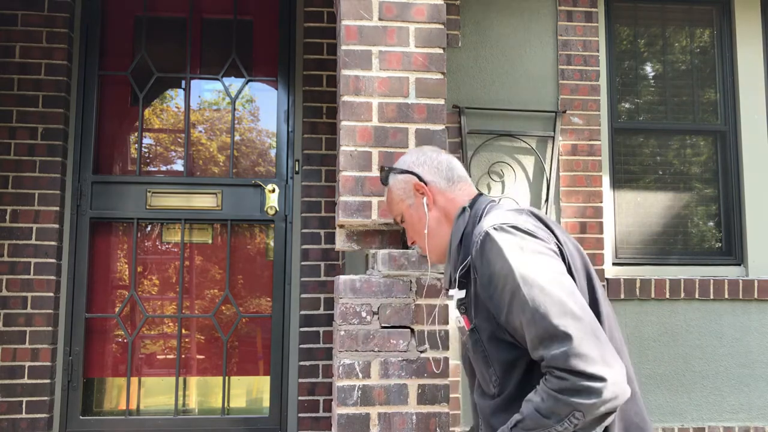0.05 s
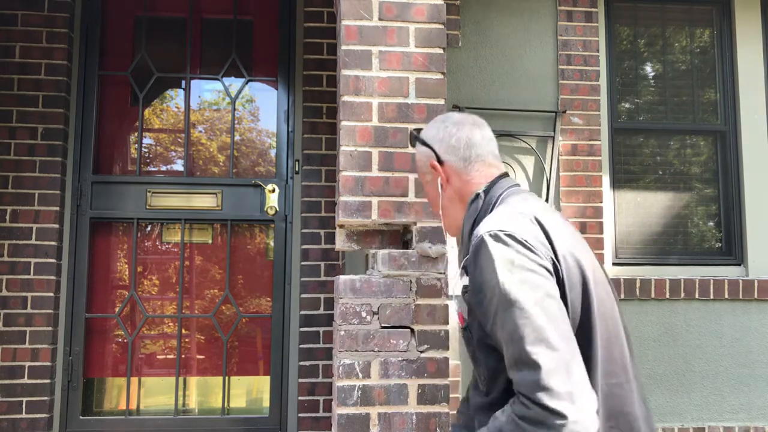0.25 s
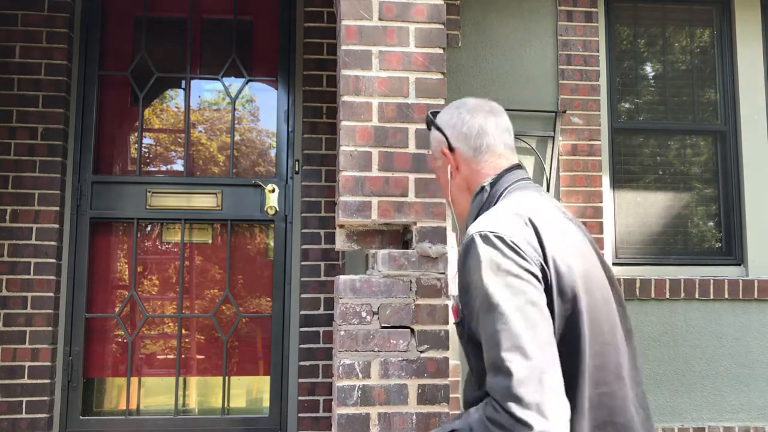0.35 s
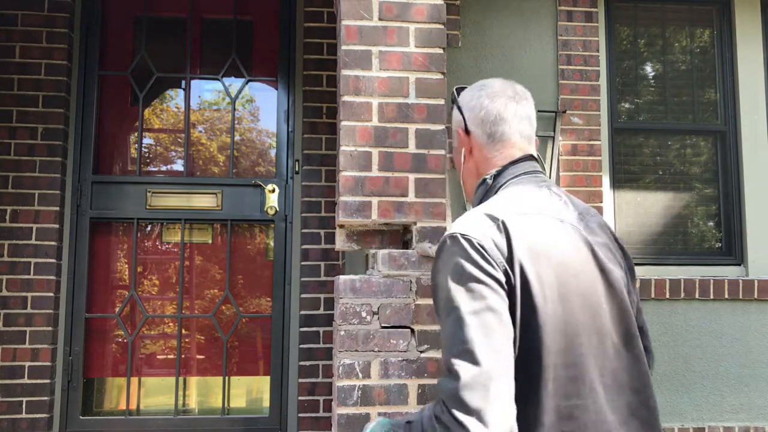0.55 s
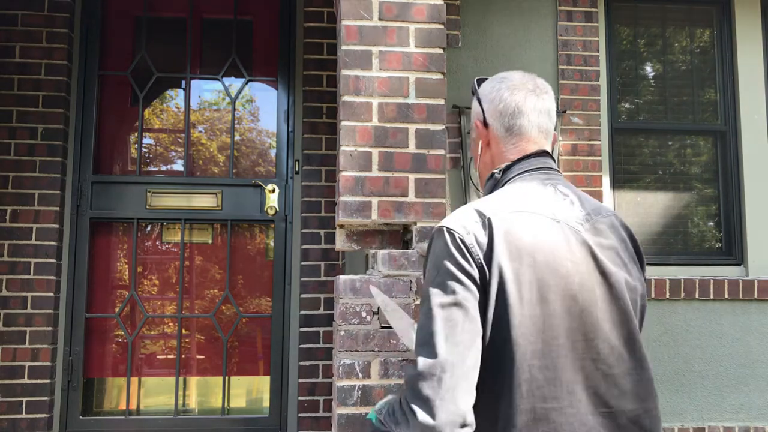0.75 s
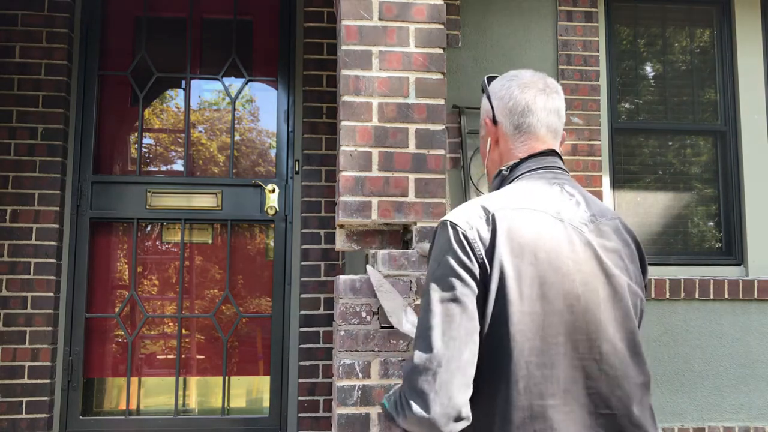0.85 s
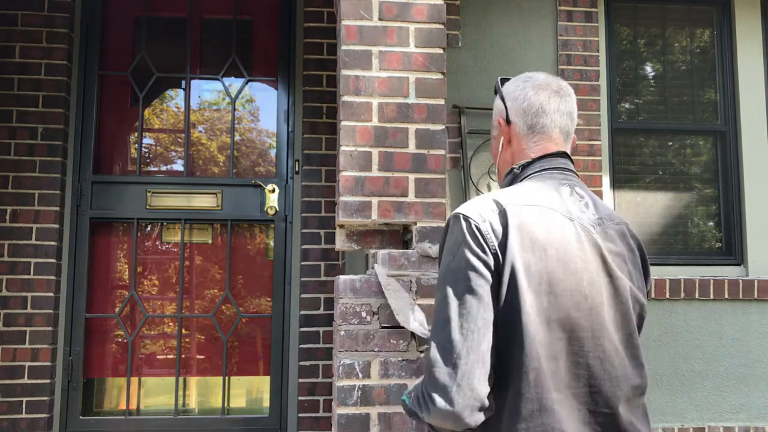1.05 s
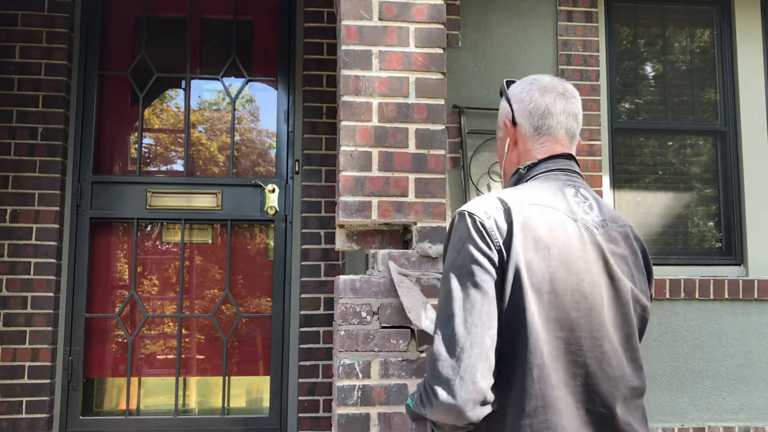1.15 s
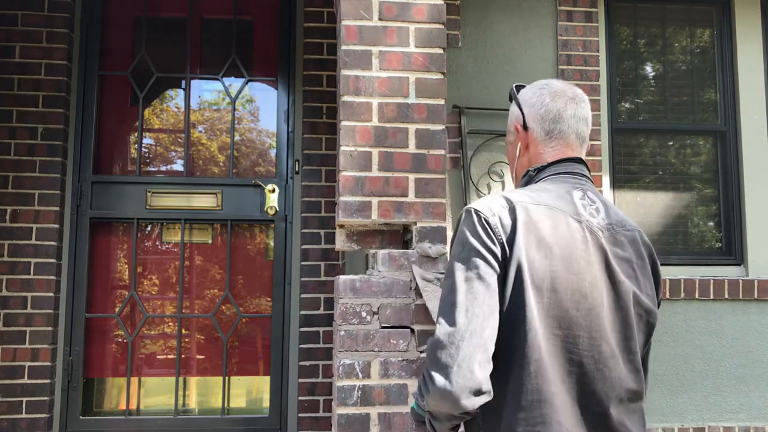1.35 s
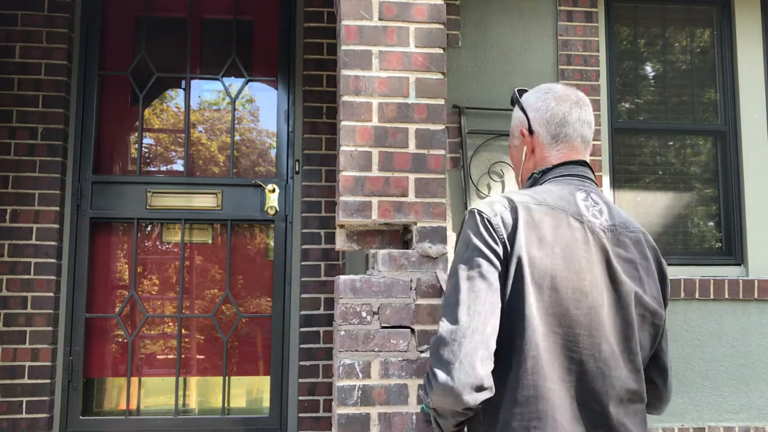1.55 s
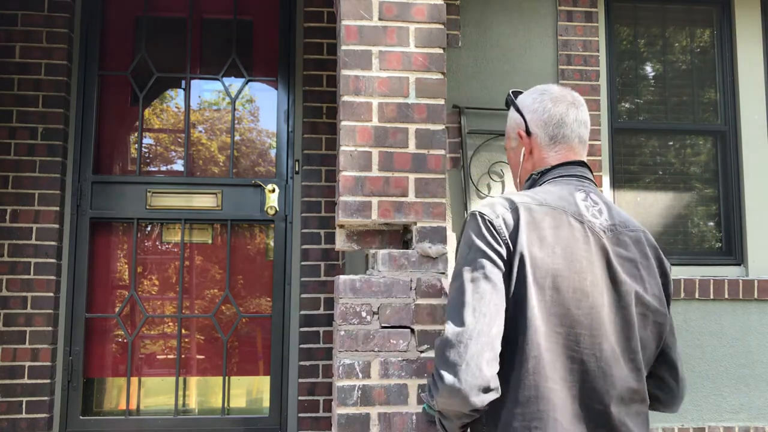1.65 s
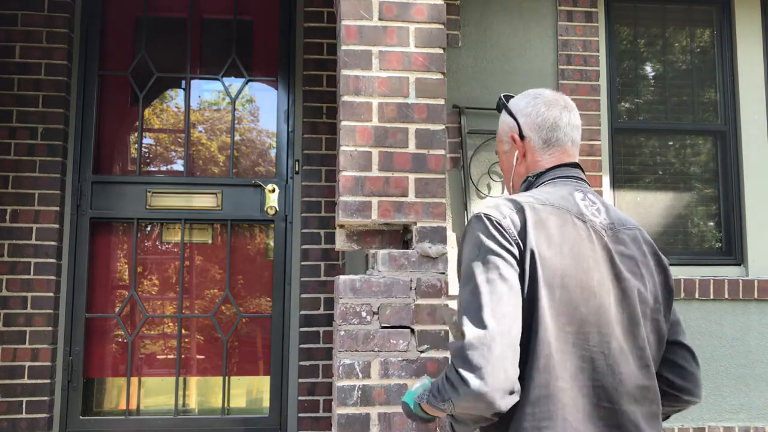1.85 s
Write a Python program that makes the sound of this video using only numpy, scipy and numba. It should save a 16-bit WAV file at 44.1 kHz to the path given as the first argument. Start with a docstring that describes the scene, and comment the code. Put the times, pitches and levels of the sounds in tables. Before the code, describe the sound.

Outdoors, a trowel gives one sharp knock on brick and then drags across the masonry, crunching sand as the blade rings. Clothing rustles and thumps softly against the microphone throughout.

```python
"""Over quiet outdoor air, a worker's jacket stirs close to the microphone. At 0.2 s a steel trowel
knocks once on a brick: the impact excites the modes of both, and the porch reflects it briefly.
The jacket bumps and rustles on. From 0.9 to 1.6 s the trowel is dragged over gritty masonry, where
stick-slip friction on grains drives the resonances of the blade, sand crunches and the tip rasps.
Two faint ticks and a few last bumps of the jacket follow."""
import sys
import numpy as np
from scipy import signal
from scipy.fft import rfft, irfft
from scipy.io import wavfile
from scipy.ndimage import uniform_filter1d
from numba import njit

SR = 44100
rng = np.random.default_rng(int(sys.argv[2]) if len(sys.argv) > 2 else 0)


def pcm_store(signal):
    """Save signal as 16-bit PCM."""
    levels = np.round(np.clip(np.atleast_2d(signal), -1, 1) * 32767)
    wavfile.write(sys.argv[1], SR, levels.astype(np.int16).T)


N = 83790


def undb(db):
    return 10 ** (np.asarray(db) / 20)


def unit(x):
    """Scale to rms 1."""
    return x / np.sqrt(np.mean(x ** 2))


def noise():
    return rng.standard_normal(N)


def clock():
    return np.arange(N) / SR


def ages(length):
    """Sample times over `length` s, at most 1 s."""
    return np.arange(int(min(length, 1) * SR) + 1) / SR


def place(events):
    """Superpose (time [s], sound) pairs."""
    out = np.zeros(N + 2 * SR)
    for s, sound in events:
        at = SR + int(round(s * SR))
        out[at:at + len(sound)] += sound
    return out[SR:SR + N]


def curve(rows, column=1):
    """Gain interpolated in time along a column of levels."""
    rows = np.array(rows)
    return undb(np.interp(clock(), rows[:, 0], rows[:, column]))


def decay(tau):
    """Sudden onset, exponential decay."""
    age = ages(10 * tau)
    return np.minimum(age * SR / 20, 1) * np.exp(-age / tau)


def fade(start, tau):
    return place([(start, decay(tau))])


def tail(start, t60):
    """A decay of 60 dB in `t60` s."""
    return fade(start, t60 / np.log(1000))


def swells(rows):
    """A rounded rise and fall per row."""
    return place((s, undb(db) * np.sqrt(np.abs(np.sin(np.pi * ages(length) / length))))
                 for s, length, db in rows)


def snags(rows):
    """A sudden onset and linear fall per row."""
    return place((s, undb(db) * (1 - ages(length) / length)) for s, length, db in rows)


def grains(per_s, spread_db):
    """Poisson impulses, many small and a few large; rms 1."""
    impulses = (rng.random(N) < per_s / SR) * rng.choice([-1, 1], N)
    return unit(impulses * undb(spread_db * np.minimum(rng.exponential(size=N), 5)))


def colour(x, spectrum, size=4096):
    """Minimum-phase filter of unit power gain, shaped like `spectrum`."""
    hz, db = np.array(spectrum).T
    f = np.maximum(np.fft.rfftfreq(size, 1 / SR), 2)
    rolloff = np.sqrt((1 + (hz[0] / f / 2) ** 4) * (1 + (f / hz[-1] / 2) ** 4))
    gain = unit(undb(np.interp(np.log(f), np.log(hz), db)) / rolloff)
    cepstrum = irfft(np.log(gain))[:size // 2]
    cepstrum[1:] *= 2
    return signal.oaconvolve(x, irfft(np.exp(rfft(cepstrum, size))))[:N]


@njit
def moving_resonance(x, hz, width_hz):
    """State-variable band-pass with a moving centre of gain 1."""
    y, band, low = np.empty(len(x)), 0., 0.
    for i in range(len(x)):
        g, k = np.tan(np.pi * hz[i] / SR), width_hz / hz[i]
        v = (band + g * (x[i] + 1e-18 - low)) / (1 + g * (g + k))
        band, low, y[i] = 2 * v - band, low + 2 * g * v, k * v
    return y


# outdoor spectrum (frequency [Hz], level [dB])
AIR_SPECTRUM = [(120, -27.5), (200, -10.5), (283, -25), (777, -21), (986, -25), (1120, -25), (2330, -32),
                (7270, -34.5), (16000, -48.5)]
def air(db=-62):
    """Stationary noise forms the outdoor background."""
    return undb(db) * colour(noise(), AIR_SPECTRUM)


# sliding cloth and short scuffs (time [s], duration [s], level [dB])
SWISHES = [(-.03, 0.077, -58), (.515, 0.048, -59), (.73, 0.058, -65.5), (.79, 0.12, -64), (1.75, .08, -65)]
RUBS = [(.4885, 0.013, -47.5), (.5615, 0.0066, -45.5), (.669, 0.019, -42.5), (.685, 0.058, -42.5),
        (.746, 0.024, -38), (.765, 0.03, -52.5), (.803, 0.015, -41), (.818, 0.037, -52)]
# rumble envelope (time [s], level [dB])
SWAY = [(0, -58), (.15, -57.5), (.22, -33.5), (.33, -50.5), (.385, -36), (.42, -45), (.55, -39), (.61, -43),
        (.68, -37.5), (.77, -33.5), (.86, -42), (.95, -37), (1.22, -39), (1.3, -52.5), (1.5, -48.5),
        (1.57, -62), (1.67, -50.5), (1.77, -56), (1.9, -39)]
# cloth spectra (frequency [Hz], level [dB])
SWISH_SPECTRUM = [(1500, 0), (4000, 6), (7000, 5), (10000, 0), (16000, -10)]
RUB_SPECTRUM = [(300, 2.5), (500, 10), (900, -23.5), (1300, -3), (1580, 6), (1900, -3.5), (3000, -12),
                (6000, -23.5), (14000, -72)]
RUMBLE_SPECTRUM = [(25, -30.5), (50, -2), (85, 3), (160, -4), (250, -14.5), (500, -24), (1000, -35.5)]
def jacket_rustle():
    """Friction of cloth radiates noise: sliding swishes and fibres snag, over the rumble of its sway."""
    swish = colour(noise() * swells(SWISHES), SWISH_SPECTRUM)
    rumble = colour(noise() * curve(SWAY), RUMBLE_SPECTRUM)
    rub = colour(grains(per_s=6000, spread_db=2) * snags(RUBS), RUB_SPECTRUM)
    return swish + rumble + rub


def ring(modes, start, rise_s=.00031):
    """Free vibration is a sum of damped modes; neighbours swing in antiphase."""
    def mode(hz, db, t60):
        age = ages(2 * t60)
        envelope = np.minimum(age / rise_s, 1) * np.exp(-np.log(1000) * age / t60)
        return undb(db) * envelope * np.cos(2 * np.pi * hz * age)
    return place((start, -(-1) ** k * mode(*row)) for k, row in enumerate(modes))


# modes of the struck steel and brickwork (frequency [Hz], level [dB], T60 [s])
STEEL_MODES = [(1150, -16, .025), (1400, -9, .03), (1735, -28, .12), (1900, -11, .028), (2130, -11, .036),
               (2570, -15, .028), (2975, -16, .04), (3280, -18, .028)]
BRICK_MODES = [(189, -16, 0.092), (248, -14.5, 0.14), (337, -8, 0.036), (466, -9, 0.032), (508, -33, .2),
               (685, -33.5, 0.21), (747, -30.5, 0.25), (786, -20, 0.21), (839, -33, 0.22),
               (1277, -33, 0.19)]
# spectra of the contact and the porch's reverberation (frequency [Hz], level [dB])
CRACK_SPECTRUM = [(1500, 7), (3000, -3), (6000, -4), (8000, -11), (9200, -4.5), (12000, -13), (16000, -21)]
PORCH_SPECTRUM = [(130, -19.5), (190, 4), (330, -2.5), (780, 1), (1000, -9.5), (1300, -11), (3000, -16.5),
                  (4500, -22), (10000, -31), (16000, -42)]
def knock(touch_s=.2022, land_s=.2048, crack_s=.0037, thud_hz=717):
    """Impact excitation: the edge touches, the full weight lands, both bodies ring, the porch answers."""
    contacts = fade(touch_s, crack_s) + undb(-4) * fade(land_s, crack_s)
    crack = undb(-13) * colour(noise() * contacts, CRACK_SPECTRUM)
    thud = -undb(-15) * fade(land_s, tau=.0033) * np.sin(2 * np.pi * thud_hz * (clock() - land_s))
    reflections = undb(-15.5) * tail(land_s, t60=.15) + undb(-34) * tail(land_s, t60=.46)
    porch = colour(noise() * reflections, PORCH_SPECTRUM)
    return crack + thud + ring(STEEL_MODES, touch_s) + ring(BRICK_MODES, land_s) + porch


# pressure pulses (time [s], peak level [dB], frequency [Hz])
BUMPS = [(0.406, -28, 105), (0.436, -26.5, 87), (0.471, -27, 80), (0.5079, -18.5, 132), (0.545, -27.5, 114),
         (0.568, -22, 79.3), (0.644, -27.5, 85), (0.6513, -27, 131), (0.675, -23, 106),
         (0.7258, -27.5, 164), (.754, -26, 163), (0.8234, -26.5, 93), (0.897, -29, 107),
         (1.018, -18.5, 117.4), (1.028, -23.5, 85), (1.069, -24, 108), (1.089, -27, 113), (1.197, -21, 125),
         (1.2213, -30.5, 123), (1.521, -36, 92), (1.707, -31, 100), (1.809, -33, 137), (1.867, -34.5, 87.3)]
def jacket_bumps(window_s=.1):
    """Soft contact with the microphone makes a low pulse: a pressure dip between two rises."""
    def pulse(db, hz):
        u = (np.pi * hz * (ages(window_s) - window_s / 2)) ** 2
        return undb(db) * (2 * u - 1) * np.exp(-u)
    return place((s - window_s / 2, pulse(db, hz)) for s, db, hz in BUMPS)


# load on the blade (time [s], press [0-1])
PRESS = [(1.08, 0.15), (1.13, 0.59), (1.19, 0.2), (1.25, 0.04), (1.285, 0.58), (1.385, 0.72), (1.42, 0.78),
         (1.48, 0.32)]
def pressure():
    """Normal load: how hard the blade is pressed flat."""
    return np.interp(clock(), *np.array(PRESS).T)


def chatter(per_s=230, depth_db=2.4, ease=.4):
    """Stick-slip friction comes in uneven bursts, which even out under load."""
    step = int(SR / per_s)
    drift = 1.35 * uniform_filter1d(noise()[np.arange(N) // step], step)  # spread near 1
    return unit(undb(depth_db * (1 - ease * pressure()) * np.minimum(drift, 2)))


def driven_mode(push, hz, width, db, drifts_per_s=22, drift_db=1.5, detune=.011):
    """A resonance whose strength and pitch drift as the contact point moves."""
    steps = np.arange(len(push)) * drifts_per_s / SR
    louder, higher = (np.interp(steps, np.arange(64), row) for row in rng.standard_normal((2, 64)))
    response = moving_resonance(push, hz * (1 + detune * higher), float(width))
    return undb(db + drift_db * louder) * response * np.sqrt(SR / (np.pi * width))


def pressed_ring(push, modes, neighbour_sign, start_s=.88, end_s=1.68):
    """Modal superposition: pressing the steel flat favours some modes over others."""
    span = slice(int(start_s * SR), int(end_s * SR))
    press = pressure()[span]
    sound = 0
    for k, (hz, width, db, pressed_db) in enumerate(modes):
        load_gain = 1 + (undb(pressed_db) - 1) * press
        sound += neighbour_sign ** k * load_gain * driven_mode(push[span], hz, width, db)
    return place([(start_s, sound / np.sqrt(len(modes)))])


# bending modes of the blade and high modes of its edge
# (frequency [Hz], bandwidth [Hz], level [dB], gain at full press [dB])
BLADE_MODES = [(709, 33, -3, -4), (832.5, 31, 4, 0.5), (954.7, 17.5, -3, 1), (993.3, 40, -4.5, 7),
               (1270.6, 30, -7.5, 12.5), (1360, 47, 1, 9.5), (1454, 210, 1, 2.5), (1664, 124, -6.5, 18.5),
               (1796, 113, 0, 7.5), (1901, 60, 2, -4.5), (2085, 58, -4.5, 3), (2244, 21, -10, 2.5),
               (2610, 100, -8, -20)]
EDGE_MODES = [(3248, 70, -5.5, 3.5), (3635, 230, 1, -2.5), (4200, 120, -4, -10), (4466, 150, -5, 6),
              (5030, 150, -8, -2), (5400, 60, -9, 4), (5866, 114, 1, -2), (6240, 110, -7.5, 9),
              (6720, 150, -7.5, 2.5), (7600, 36, -10, -10), (8430, 200, -8, 6), (9350, 310, -0.5, -7),
              (10110, 190, -0.5, -9), (11050, 73, -8, -8), (12300, 250, -14, 2), (14200, 270, -21, 0)]
def trowel_ring(blade_push, edge_push):
    """Forced vibration: blade modes alternate in sign; edge modes agree, leaving antiresonances."""
    return pressed_ring(blade_push, BLADE_MODES, -1) + pressed_ring(edge_push, EDGE_MODES, 1)


# drive from the stroke and from catches on larger grains (time [s], blade level [dB], edge level [dB])
STROKE = [(.9, -86.5, -95), (.915, -34, -68), (.945, -51, -71), (.963, -32.5, -44), (1.015, -50, -46.5),
          (1.035, -38.5, -39.5), (1.06, -38, -38.5), (1.108, -37, -43.5), (1.14, -34, -30),
          (1.205, -36, -45.5), (1.26, -33, -39.5), (1.285, -34, -30.5), (1.31, -34.5, -36),
          (1.33, -32, -36.5), (1.38, -37, -32.5), (1.41, -40, -42), (1.425, -32.5, -30.5),
          (1.478, -39.5, -41.5), (1.502, -40, -33.5), (1.542, -41, -43), (1.565, -83, -67), (1.6, -81, -99)]
CATCHES = [(.9055, -38, -17), (.9145, -24, -29), (.924, -32.5, -38), (.933, -33, -53), (.9455, -43, -34),
           (.958, -27.5, -25.5), (0.9661, -38, -25), (.9825, -42, -32), (0.9904, -29, -19),
           (1.002, -30, -31), (1.0587, -26, -25), (1.0644, -25, -15), (1.076, -23, -20),
           (1.0918, -17.5, -17), (1.1118, -22, -18), (1.1162, -17.5, -24), (1.1265, -19, -13),
           (1.138, -35, -22), (1.1468, -20.5, -21.5), (1.2336, -28, -22.5), (1.2791, -37, -22),
           (1.294, -17, -18), (1.332, -20.5, -23), (1.3705, -18.5, -26), (1.379, -24.5, -29),
           (1.493, -23, -21.5), (1.5054, -38, -17.5)]
# spectrum of crushed grit (frequency [Hz], level [dB])
CRUNCH_SPECTRUM = [(500, -2), (850, 4), (1100, -10), (1400, 2), (2000, -1), (2900, 2), (4100, -7.5),
                   (7000, -5), (12000, -12.5), (16000, -11.5)]
def scrape(slip, catch_s=.0015, snap_db=14.5):
    """Roughness excitation: grains crunch and drive the steel; large ones catch, release and crumble."""
    grit = slip * grains(per_s=3200, spread_db=2.7)
    crumble = np.sign(noise())
    effort = curve(STROKE)
    snaps = place((s, [undb(db + snap_db)]) for s, db, _ in CATCHES)
    blade_catches = place((s, undb(db) * decay(catch_s)) for s, db, _ in CATCHES)
    edge_catches = place((s, undb(db) * decay(catch_s)) for s, _, db in CATCHES)
    blade_push = grit * effort + crumble * blade_catches
    edge_push = grit * curve(STROKE, column=2) + crumble * edge_catches
    steel = trowel_ring(grit * effort + snaps, edge_push)
    crunch = colour(undb(-11.5) * blade_push + undb(-15) * edge_push, CRUNCH_SPECTRUM)
    return steel + crunch + brick_resonance(effort)


def brick_resonance(effort, hz=498, width_hz=380):
    """Heavy damping gives the scraped brick one broad, low resonance."""
    band = signal.lfilter(*signal.iirpeak(hz, hz / width_hz, fs=SR), noise())
    return undb(-17.5) * effort * unit(band)


def porch_reverb(direct, wet_db=-19.5):
    """Reverberation: convolution with decaying noise adds diffuse reflections to the direct sound."""
    walls = (noise() * tail(.004, t60=.14))[:SR // 4]
    return direct + undb(wet_db) * signal.oaconvolve(direct, walls / np.linalg.norm(walls))[:N]


# stretches of fine sand (time [s], duration [s], level [dB])
SANDING = [(1.025, 0.035, -49.5), (1.262, 0.26, -40), (1.485, 0.046, -66)]
# their spectrum (frequency [Hz], level [dB])
SAND_SPECTRUM = [(2000, -1), (3500, -2.5), (5800, 0.5), (7600, -4.5), (8400, 6), (9500, -12), (11000, -9),
                 (14200, -6), (16000, -14)]
def sand(slip):
    """Brittle fracture of fine sand under the edge gives dense, bright clicks."""
    return colour(slip * grains(per_s=7000, spread_db=4.9) * swells(SANDING), SAND_SPECTRUM)


# rasps of the tip (time [s], duration [s], level [dB])
RASPS = [(1.15, 0.13, -41), (1.494, 0.05, -36)]
# their spectrum (frequency [Hz], level [dB])
RASP_SPECTRUM = [(1600, -6.5), (2500, -13), (3250, 9.5), (3550, 1), (3850, 3.5), (4700, 3), (5700, 0.5),
                 (7400, -5), (12000, -39)]
def tip_rasp():
    """Sliding friction at the tip: tiny impacts merge into a rasp."""
    return colour(grains(per_s=4400, spread_db=3.1) * swells(RASPS), RASP_SPECTRUM)


# gritty ticks (time [s], duration [s], level [dB])
TICKS = [(1.603, 0.014, -52), (1.7435, 0.009, -52.5)]
# their spectrum (frequency [Hz], level [dB])
TICK_SPECTRUM = [(700, -17), (1400, -1), (2000, 6), (2900, -9), (4000, -5.5), (6500, -18), (14000, -34)]
def ticks():
    """Brief clusters of impulses fuse into faint ticks once the blade has lifted."""
    return colour(grains(per_s=6000, spread_db=2) * snags(TICKS), TICK_SPECTRUM)


def scene():
    """All sources superpose in one channel."""
    sound = air() + jacket_rustle() + knock() + jacket_bumps()
    slip = chatter()
    drag = porch_reverb(scrape(slip) + sand(slip) + tip_rasp())
    return (sound + drag + ticks())[None]


def record(dry, top_hz=15700):
    """Clipping at full scale, then a steep low-pass."""
    return signal.sosfilt(signal.ellip(8, .2, 70, top_hz, fs=SR, output="sos"), np.clip(dry, -1, 1))


dry = scene()
out = record(dry)
pcm_store(out)
```